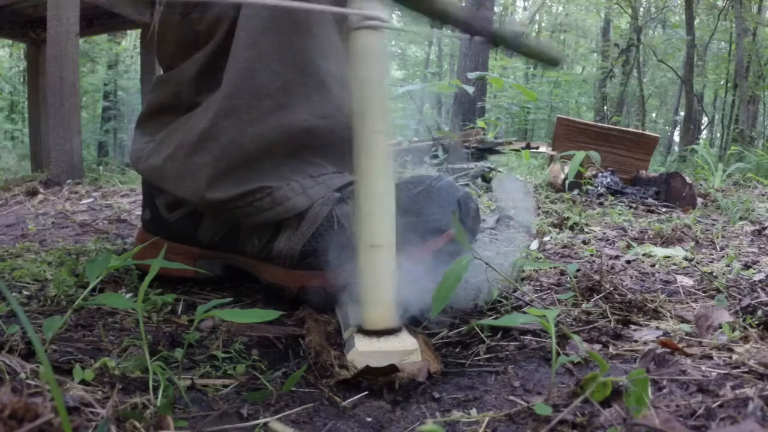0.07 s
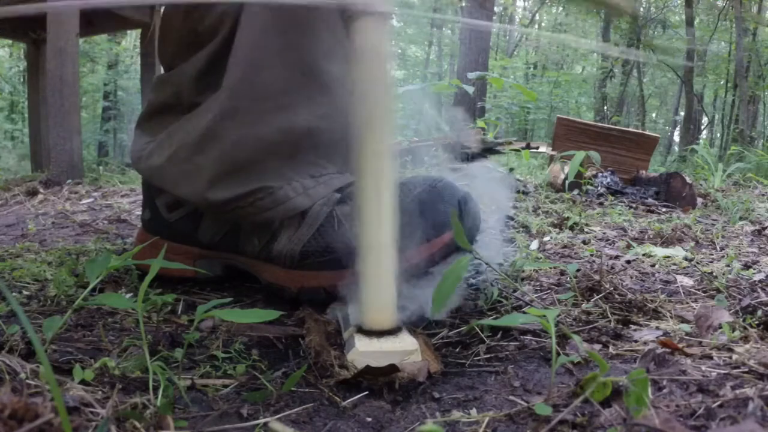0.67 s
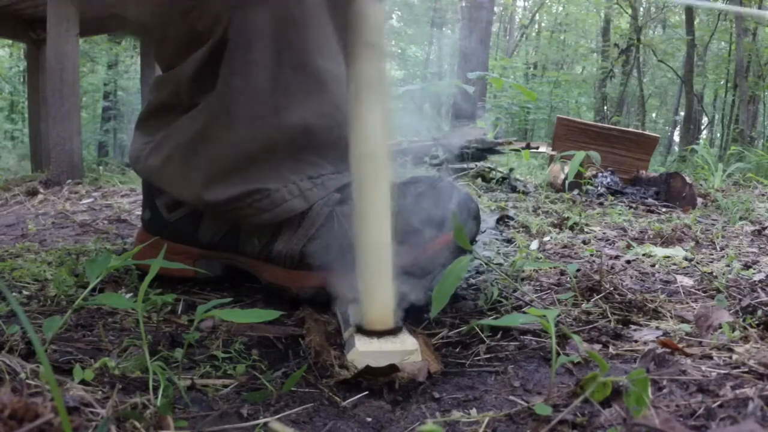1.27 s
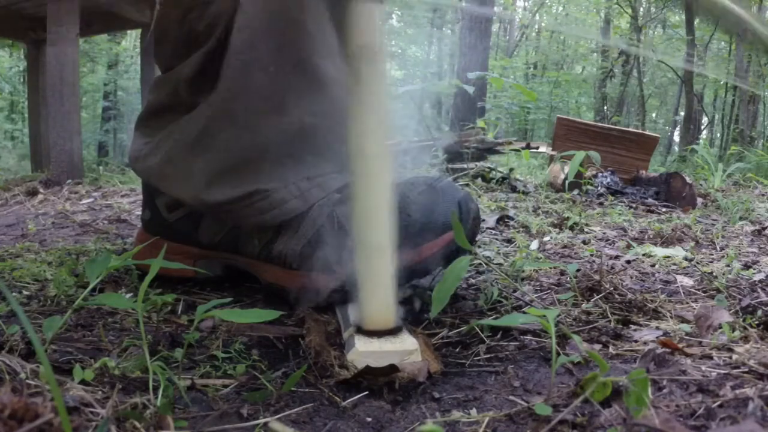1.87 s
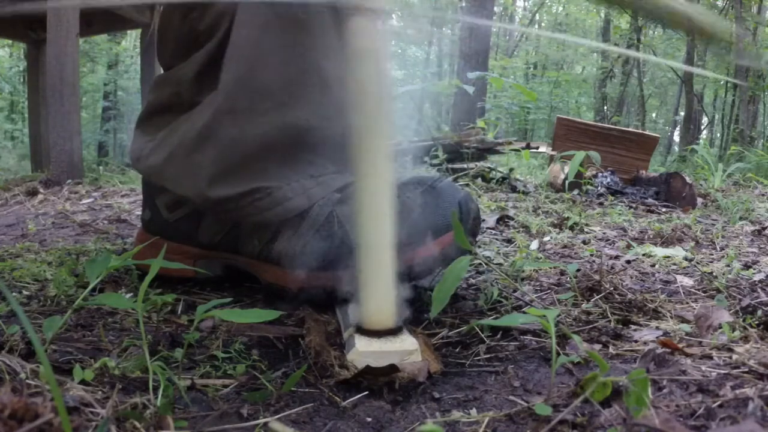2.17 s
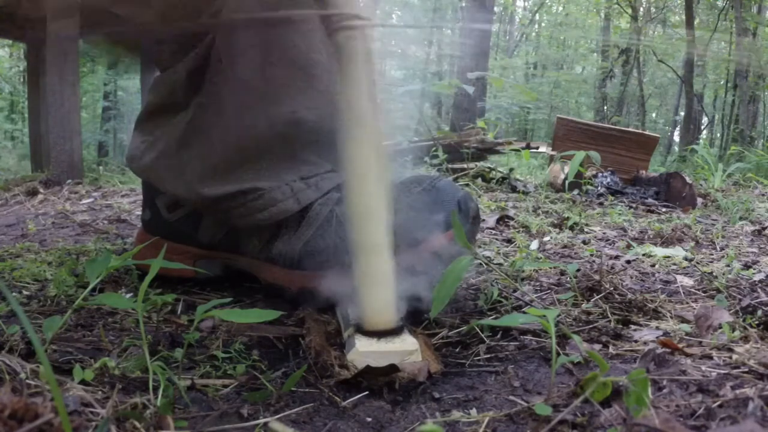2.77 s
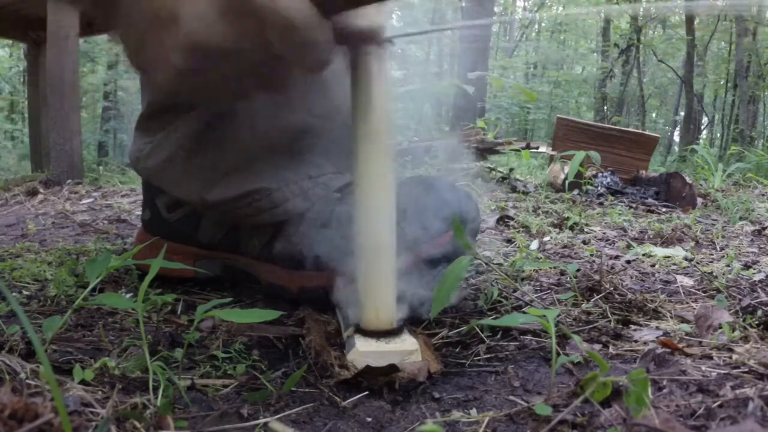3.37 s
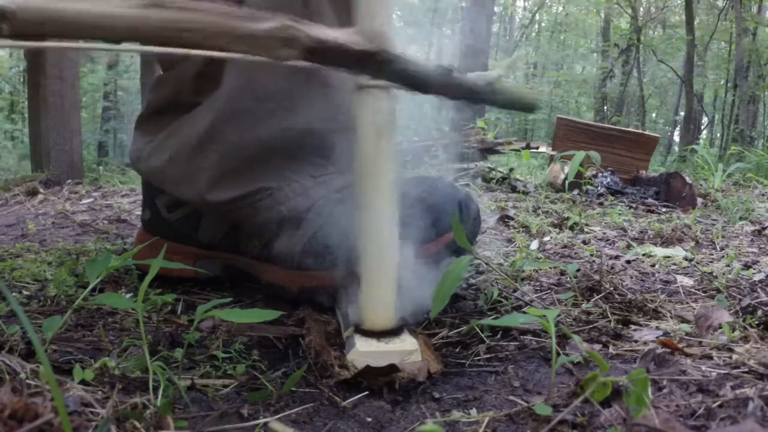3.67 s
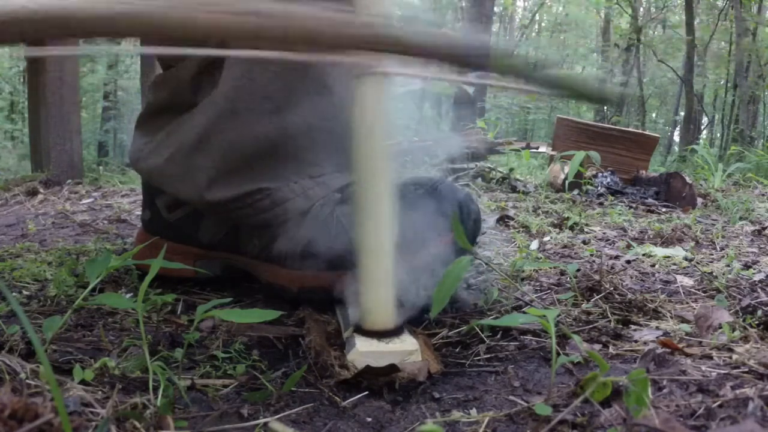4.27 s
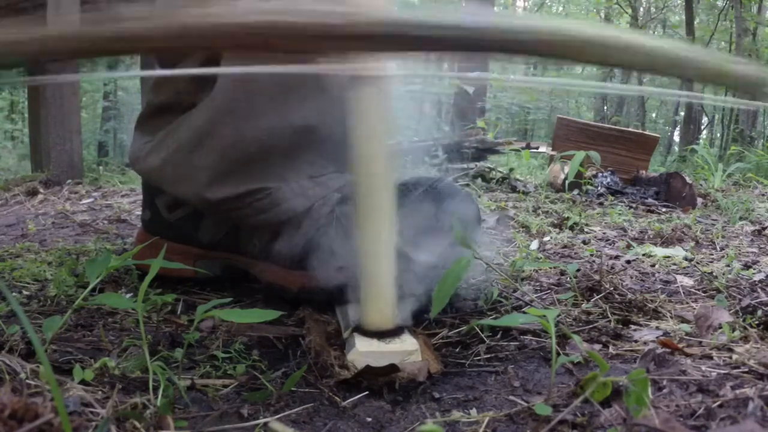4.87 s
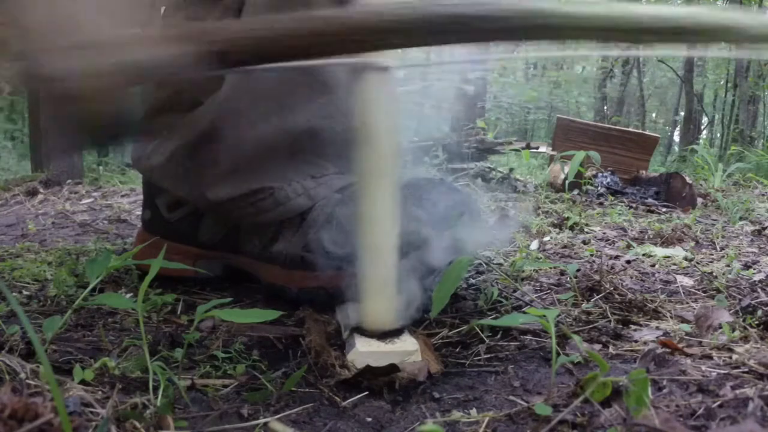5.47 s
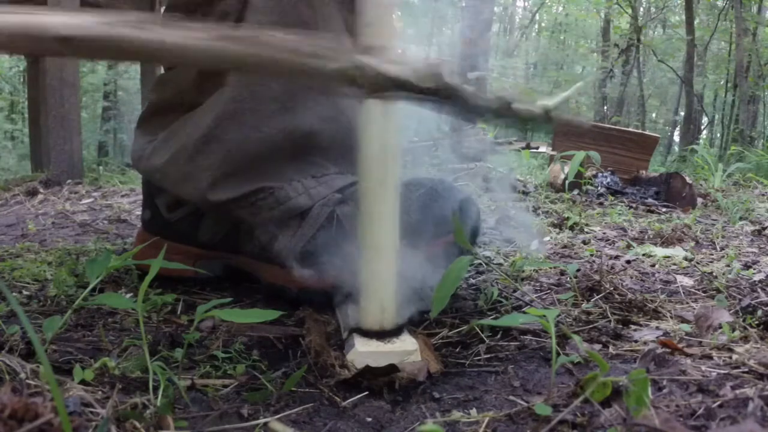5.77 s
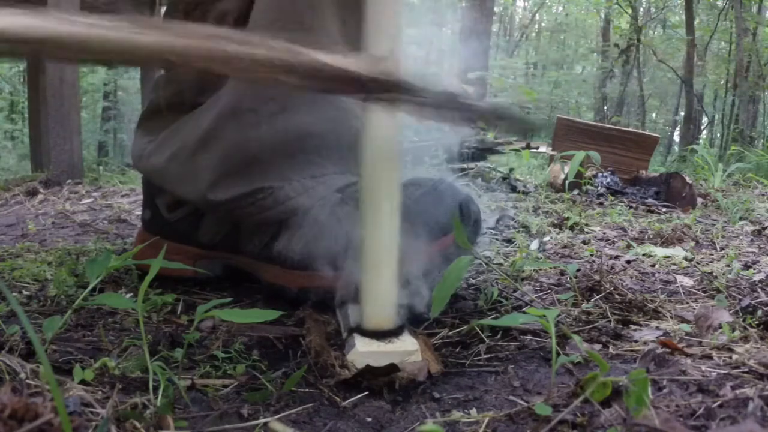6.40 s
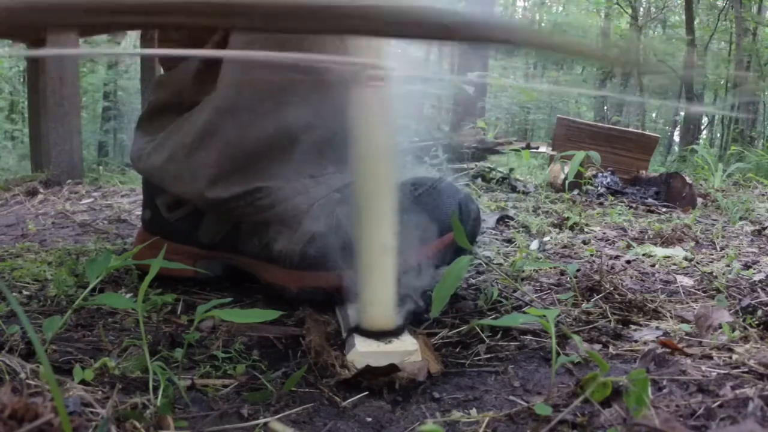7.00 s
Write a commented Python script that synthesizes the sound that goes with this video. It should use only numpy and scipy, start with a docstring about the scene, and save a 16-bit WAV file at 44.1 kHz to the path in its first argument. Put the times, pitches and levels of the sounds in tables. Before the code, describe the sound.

A bow drill runs from the start, close to the microphone on a forest floor. The wooden spindle spins up and stops about four times a second, each stroke a gritty, fluttering scrape with a low rumble from the board, a hiss and fine crackles of char. Hard and easy strokes alternate. The hard ones catch and knock in a quick chatter about every half second, with very short groans near 0.1, 0.6, 1.1 and 1.6 seconds. From about 1.6 seconds the chatter turns sharper, and it is stronger from 2.5 seconds on. The easy strokes carry a thin, hoarse squeak and end with a faint, falling hum of the cord. The grinding eases somewhat between 5 and 6 seconds while the knocking continues. A last chatter comes near 6.9 seconds, then a much softer stroke at 7. Behind it all lies a low, steady woodland hush, with almost no echo.

```python
"""A bow drill, worked on the forest floor close to the microphone.
The spindle spins up and stops with every stroke, grinding charred wood in the hearth board and
swelling once a turn. On the hard strokes it catches and slips, knocking the board and at first
groaning; on the easy ones it squeaks, and the bow cord hums faintly as it slackens.
Behind it lie quiet woodland air and a faint, dull scatter from trunks and leaves."""
import sys
import numpy as np
from scipy import signal
from scipy.fft import rfft, irfft
from scipy.io import wavfile

SR = 44100
rng = np.random.default_rng(int(sys.argv[2]) if len(sys.argv) > 2 else 0)


def generate_wav(sig):
    """Save sig (samples, or channels by samples) to the path in sys.argv[1] as 16-bit PCM at SR."""
    pcm = np.round(np.clip(np.atleast_2d(sig).T, -1, 1) * 32767).astype(np.int16)
    wavfile.write(sys.argv[1], SR, pcm)


N = 310464

# bow strokes, hard and easy in turn; at the "pass" the tip's high spot comes round near top speed:
# start t/s, pass t/s, end t/s, top spin/(turns/s), pressure/dB
STROKES = [(-0.044, 0.118, 0.207, 38.3, -28.5), (0.218, 0.365, 0.459, 35, -29),
           (0.463, 0.6038, 0.695, 35, -30), (0.701, 0.842, 0.935, 34, -31), (0.951, 1.0844, 1.183, 35, -30),
           (1.212, 1.305, 1.432, 36, -30.5), (1.425, 1.5676, 1.656, 37, -29),
           (1.662, 1.8, 1.908, 35.4, -30), (1.917, 2.0566, 2.162, 41, -28.3),
           (2.168, 2.31, 2.421, 48.4, -28.5), (2.439, 2.5781, 2.686, 45.6, -27),
           (2.71, 2.824, 2.965, 43, -29.5), (2.92, 3.1414, 3.224, 43.1, -27.7),
           (3.256, 3.379, 3.518, 38.7, -30.3), (3.521, 3.6694, 3.777, 41.2, -29.5),
           (3.83, 3.931, 4.071, 36.1, -30.5), (4.078, 4.2195, 4.325, 40.7, -29),
           (4.369, 4.47, 4.601, 39.7, -29), (4.604, 4.7444, 4.847, 44.1, -29),
           (4.847, 5.022, 5.123, 38.3, -33.5), (5.124, 5.2756, 5.385, 42.3, -32),
           (5.419, 5.558, 5.681, 36, -36), (5.63, 5.8377, 5.923, 38, -33.5), (5.957, 6.094, 6.209, 38, -31),
           (6.203, 6.3655, 6.467, 42.2, -31.5), (6.501, 6.648, 6.756, 38.4, -34),
           (6.763, 6.8936, 7.013, 39.7, -30), (6.996, 7.143, 7.271, 40, -45.5)]


def friction(slips, easy_smoothing=0.27):
    """The tip grinds in its socket: the faster, the louder, pressing harder once a turn."""
    # spectra of the rumbling board and the grinding, hissing tip: f/Hz, level/dB
    rumble_spectrum = [(24, -43), (40, -29), (75, 3), (119, -4.5), (140, -2), (190, -2.5), (294, -6.5),
                       (330, -5), (415, -3), (572, -8.5), (617, -13.5), (658, -18), (758, -20),
                       (850, -14.5), (1100, -58), (1870, -120)]
    grind_spectrum = [(410, -22), (700, -3), (851, -10), (989, -1), (1250, 1.5), (1620, -4), (1990, -7),
                      (2400, -8), (3120, -24), (5280, -120)]
    hiss_spectrum = [(1180, -39), (2000, -3), (2290, -13.5), (2630, 0), (3370, 2.5), (4480, 1),
                     (5360, -4.5), (6870, -11.5), (8150, -20), (9030, -13), (10000, -24.5), (11300, -21),
                     (14200, -44), (15500, -46)]
    # spectra of snapping char and of the glazed tip's hoarse squeak: f/Hz, level/dB
    crumb_spectrum = [(3000, -30), (7000, 7.5), (8200, 0.5), (9200, 2), (12000, -6.5), (15000, -12)]
    squeak_spectrum = [(3900, -6), (4500, 4.5), (5050, -12), (6700, -10.5), (7800, -32), (9200, -15.5),
                       (10200, -34)]
    # how strongly the char crumbles: t/s, level/dB
    crumbling = [(0, 1.5), (2.2, 0), (3.1, 4), (4.4, 3.5), (5.1, 0), (6, -0.5), (7, 1)]
    speed, swell, easy, (rumble_gain, grind_gain, hiss_gain) = bowing()
    uneven = drift(250) * (1 - easy_smoothing * easy)
    coarse, fine = grains(5000, spread_db=2.6), grains(20000, spread_db=2.4)
    rumble = coloured(rng.standard_normal(N), rumble_spectrum) * from_db(0.57 + 2 * swell)
    rumble *= speed ** 1.78
    grind = coloured(coarse, grind_spectrum) * from_db(2.35 + 2.55 * swell + 2 * uneven) * speed ** 1.365
    hiss = coloured(fine, hiss_spectrum) * from_db(-0.37 + 0.91 * swell + 3.36 * uneven) * speed ** 1.54
    # crumbs snap most often where the tip presses hardest
    snaps = grains(1200 * from_db(8 * swell), spread_db=4.2)
    crumbs = from_db(-14.5) * coloured(snaps, crumb_spectrum) * speed ** 1.52
    crumbs *= from_db(np.interp(np.arange(N) / SR, *np.transpose(crumbling)))
    squeak = coloured(rng.standard_normal(N), squeak_spectrum) * from_db(-6 + 9.5 * swell)
    squeak *= easy * speed ** 6  # only near the top speed of easy strokes
    rubbing = grind_gain * grind + hiss_gain * (hiss + crumbs + squeak)
    return rumble_gain * rumble + tip_contact(slips) * rubbing


def bowing():
    """The bow drives the spindle: speed (0-1), swell (-1 to 1), easy stroke (0/1), three rubbing gains."""
    speed, swell, easy, gains = np.zeros(N), np.zeros(N), np.zeros(N), np.zeros((3, N))
    for k, (*motion, pressure_db) in enumerate(STROKES):
        span, stroke_speed, turns = stroke(*motion)
        # a stroke takes over once it outruns the end of the one before
        faster = stroke_speed > speed[span]
        active = span[faster]
        speed[active], easy[active] = stroke_speed[faster], k % 2
        # the high spot passes quickly: narrow crests, broad troughs
        swell[active] = 2 * np.abs(np.cos(np.pi * turns[faster])) ** 3 - 1
        gains[:, active] = from_db(rubbing_db(pressure_db, k % 2))[:, None]
    return speed, swell, easy, gains


def stroke(start_s, pass_s, end_s, turns_per_s, lead_s=0.011):
    """One sweep of the bow, fastest just before the pass: samples, speed (0-1), turns from the pass."""
    span = np.arange(int(start_s * SR), int(end_s * SR))
    skew = np.log(.5) / np.log((pass_s - lead_s - start_s) / (end_s - start_s))
    speed = np.abs(np.sin(np.pi * np.linspace(0, 1, len(span)) ** skew))
    turns = turns_per_s * np.cumsum(speed ** .35) / SR
    turns -= np.interp(pass_s * SR, span, turns)
    heard = (span >= 0) & (span < N)
    return span[heard], speed[heard], turns[heard]


def rubbing_db(pressure_db, easy, usual_db=-28):
    """Rumble, grinding and hiss each rise with the pressure at their own rate."""
    # friction offsets on hard, then easy strokes: rumble/dB, grinding/dB, hiss/dB
    offsets_db = [(2, 0.27, 0), (-0.5, -3, -0.5)]
    db_per_db = np.array([0.62, 1.28, 0.86])
    return usual_db + db_per_db * (pressure_db - usual_db) + np.array(offsets_db[easy])


def grains(per_s, spread_db):
    """Fibres and char break in random clicks of very uneven size."""
    sizes = from_db(spread_db * np.minimum(rng.exponential(1, N), 5))
    return sizes * rng.choice([-1, 1], N) * (rng.random(N) < per_s / SR)


def slipping(turns_each_side=3, tap_hz=1260, sag_hz_per_s=1700):
    """The high spot catches once a turn. Rows: t/s, thump/dB, thud/dB, ring/dB, crack/dB, ring f/Hz."""
    # the spindle chatters in the middle of each hard stroke:
    # peak t/s, half-width/s, ground thump/dB, board thud/dB, spindle ring/dB, crack/dB, ring f/Hz
    chatters = [(.12, 0.046, -25, -24.5, -26, -42, 1170), (.612, 0.052, -26, -29.5, -30.5, -39, 1230),
                (1.1, 0.048, -26, -30.5, -27.5, -46, 1170), (1.567, .018, -33, -23.5, -9, -23, 1330),
                (2.05, 0.031, -25, -19, -15, -37, 1320), (2.589, 0.045, -21, -17, -14, -24, 1310),
                (3.138, 0.042, -22, -23, -17.5, -27.5, 1250), (3.68, 0.038, -19.5, -17, -17.5, -20, 1310),
                (4.226, .04, -19, -19.5, -21, -24, 1240), (4.745, 0.04, -22, -15.5, -14, -16.5, 1280),
                (5.284, .055, -24.5, -20.5, -14.5, -19.5, 1286), (5.827, 0.041, -22, -19, -15.5, -22, 1260),
                (6.36, .042, -23.5, -18, -14.5, -18, 1240), (6.904, 0.039, -21, -18, -22, -19.5, 1170)]
    # a light tap at top speed, relative to the grinding: thump/dB, thud/dB, ring/dB, crack/dB
    tap_db = (-3.5, -2.5, -1.5, -26)
    slips = []
    for k, (*motion, pressure_db) in enumerate(STROKES[:-1]):
        span, speed, turns = stroke(*motion)
        peak_s, width_s, *peak_db, ring_hz = chatters[k // 2]
        grind_db = rubbing_db(pressure_db, k % 2)[1]
        for turn in range(-turns_each_side, turns_each_side + 1):
            at_s, pace = np.interp(turn, turns, span / SR), np.interp(turn, turns, speed)
            tap = from_db(grind_db + np.array(tap_db) + 2 * rng.standard_normal(4)) * pace ** 1.92
            chatter = np.exp(-abs((at_s - peak_s) / width_s) ** 3.4)  # flat top, quick end
            knock = from_db(peak_db + 0.7 * rng.standard_normal(4)) * chatter
            hz = ring_hz - sag_hz_per_s * (at_s - peak_s) if knock.sum() > tap.sum() else tap_hz
            levels_db = 20 * np.log10(np.maximum(tap, knock) + 1e-9)
            slips.append((at_s, *levels_db, hz))
    return slips


def tip_contact(slips, dip_db=6, after_s=0.0105, width_s=0.0021):
    """After a slip the tip bounces and rubs less for a moment."""
    dips, t = np.zeros(N), np.arange(SR // 30) / SR
    bounce = np.exp(-((t - after_s) / width_s) ** 2)
    for at_s, _, thud_db, *_ in slips:
        add(dips, at_s, min(1, from_db(thud_db + 32)) * bounce)
    return from_db(-dip_db * dips)


def knocks(slips, scuff_s=0.0018, ring_t60_s=0.0087, return_s=0.0026, return_gain=0.64):
    """Each slip, a snap inside a short scuff, rings ground, board and spindle."""
    # modes of the board bouncing on the soil, and of the board itself: f/Hz, level/dB, t60/s
    ground_modes = [(79.4, -7, 0.068), (110, -6.5, 0.083), (187.7, -1.5, 0.052)]
    board_modes = [(396, 0.5, 0.02), (467.5, -4.5, 0.12)]
    # higher modes of the spindle: f/Hz, level/dB, t60/s
    spindle_modes = [(2220, -6, 0.0064), (2780, -5, 0.0036), (3460, -15.5, 0.024), (4370, -43, 0.022)]
    out = np.zeros(N)
    t = (np.arange(SR // 8) - SR // 200) / SR
    for at_s, thump_db, thud_db, ring_db, crack_db, ring_hz in slips:
        scuff = .055 * rng.standard_normal(len(t)) * np.exp(-np.abs(t) / scuff_s)
        push = bending_wave((t == 0) + scuff)
        # the wave runs up the spindle and comes back
        returned = return_gain * np.roll(push, int(return_s * SR * jitter(0.36)))
        # two close modes beat: the ring builds up briefly and stops short
        ring = mode(mode(push, ring_hz - 120, ring_t60_s), ring_hz + 120, ring_t60_s)
        knock = from_db(ring_db + 0.44) * ring
        knock += from_db(thump_db) * body(push, ground_modes)
        knock += from_db(thud_db) * body(push, board_modes)
        knock += from_db(crack_db) * body(push + returned, spindle_modes)
        add(out, at_s + t[0], knock)
    return board_radiation(out)


def bending_wave(push, soft_hz=5600, delay_at_1khz_s=0.00025):
    """A soft contact sends a bending wave along the wood; the treble arrives first."""
    hz = np.fft.rfftfreq(len(push), 1 / SR)
    travel = np.exp(-4j * np.pi * delay_at_1khz_s * np.sqrt(1000 * hz))
    dispersed = irfft(rfft(push) * travel, len(push))
    return signal.sosfilt(signal.butter(3, soft_hz, fs=SR, output="sos"), dispersed)


def body(push, modes):
    """The modes of one body, a little different in strength and pitch at every blow."""
    return sum(from_db(db) * jitter(3) * mode(push, hz * jitter(0.23), t60_s) for hz, db, t60_s in modes)


def mode(push, hz, t60_s):
    """One mode answering a push, scaled to the energy of 10 ms at rms 1."""
    radius, angle = from_db(-60 / (t60_s * SR)), 2 * np.pi * hz / SR
    out = signal.lfilter([1, 0, -1], [1, -2 * radius * np.cos(angle), radius ** 2], push)
    return out / np.sqrt(np.sum(out ** 2) / (SR / 100))


def board_radiation(x, low_hz=54.7, hollow_hz=650, hollow_depth=0.57):
    """The small board sheds the lowest bass, and cancels the spindle between their resonances."""
    notched = signal.lfilter(*signal.iirnotch(hollow_hz, Q=3.1, fs=SR), x)
    hollow = x + hollow_depth * (notched - x)
    return signal.sosfilt(signal.butter(2, low_hz, "high", fs=SR, output="sos"), hollow)


def groans(rise=0.114, waver=0.081, buzz=0.32):
    """Stick and slip lock to the board's resonance: a rough tone, rising as the spindle slows."""
    # slips running together into a groan: t/s, length/s, f/Hz, level/dB
    groan_events = [(.141, 0.04, 469, -21.5), (0.627, 0.03, 425, -30), (1.105, 0.029, 422, -19.5),
                    (1.592, 0.047, 478, -28.5)]
    out = np.zeros(N)
    for at_s, length_s, pitch_hz, level_db in groan_events:
        progress = np.linspace(0, 1, int(length_s * SR))
        hz = pitch_hz * (1 + rise * progress + waver * drift(387)[:len(progress)])
        phase = 2 * np.pi * np.cumsum(hz) / SR
        tone = np.sin(phase) + buzz * (np.sin(2 * phase) + np.sin(3 * phase))
        envelope = np.sqrt(np.abs(np.sin(np.pi * progress)))
        add(out, at_s, from_db(level_db) * envelope * tone)
    return out


def cord_hum(pitch_hz=165, level_db=-42, sag=0.267, length_s=0.186, lead_s=0.15):
    """At the end of each easy stroke the cord slackens and hums with a falling pitch."""
    out, progress = np.zeros(N), np.linspace(0, 1, int(length_s * SR))
    for _, _, end_s, *_ in STROKES[1::2]:
        hz = pitch_hz * jitter(0.793) * (1 - sag * progress)
        phase = 2 * np.pi * np.cumsum(hz) / SR
        tone = np.sin(phase) + from_db(-4) * np.sin(2 * phase) + from_db(-9) * np.sin(3 * phase)
        add(out, end_s - lead_s, from_db(level_db) * np.sin(np.pi * progress) * tone)
    return out


def woodland_scatter(x, level_db=-31, t60_s=0.088, delay_s=0.008, top_hz=1800):
    """Nearby trunks and leaves scatter a faint, dull tail back to the microphone."""
    t = np.arange(SR // 2) / SR
    tail = rng.standard_normal(len(t)) * from_db(-60 * t / t60_s) * (t > delay_s)
    tail = signal.sosfilt(signal.butter(1, top_hz, fs=SR, output="sos"), tail)
    return from_db(level_db) * signal.fftconvolve(x, tail / np.linalg.norm(tail))[:N]


def woodland_air(level_db=-40.5):
    """The still wood all around: a low, steady hush."""
    # spectrum of the air: f/Hz, level/dB
    air_spectrum = [(25, 6), (60, -0.5), (150, 0.5), (300, -9), (500, -19.5), (1000, -18.5), (2000, -32),
                    (4000, -32), (8000, -44.5), (15000, -54)]
    return from_db(level_db) * coloured(rng.standard_normal(N), air_spectrum)


def coloured(x, spectrum):
    """Shape x by a spectrum that falls 40 dB an octave beyond its ends; rms 1."""
    hz = np.maximum(np.fft.rfftfreq(N, 1 / SR), 1)
    points_hz, level_db = np.transpose(spectrum)
    octaves_outside = np.abs(np.log2(hz / np.clip(hz, points_hz[0], points_hz[-1])))
    gain = from_db(np.interp(np.log(hz), np.log(points_hz), level_db) - 40 * octaves_outside)
    return rms_one(irfft(rfft(x) * gain, N))


def drift(per_s):
    """A random wander with per_s new values a second; rms 1."""
    count = int(N / SR * per_s) + 2
    return rms_one(np.interp(np.arange(N) / SR * per_s, np.arange(count), rng.standard_normal(count)))


def jitter(spread_db):
    """A random factor around 1."""
    return from_db(spread_db * rng.standard_normal())


def from_db(db):
    return 10 ** (np.asarray(db) / 20)


def rms_one(x):
    return x / np.sqrt(np.mean(x ** 2) + 1e-20)


def add(track, at_s, sound):
    at = int(np.clip(round(at_s * SR), 0, N))
    track[at:at + len(sound)] += sound[:N - at]


def scene():
    """The drill close up, the quiet wood behind; mono."""
    slips = slipping()
    drill = friction(slips) + knocks(slips) + groans() + cord_hum()
    return (drill + woodland_scatter(drill) + woodland_air())[None]


def record(dry):
    """The microphone sheds the deepest bass, the highest peaks are rounded and the top is cut."""
    low_hz, top_hz, ceiling = 35, 15400, 0.97
    lean = signal.sosfilt(signal.butter(2, low_hz, "high", fs=SR, output="sos"), dry)
    rounded = ceiling * np.tanh(lean / ceiling)
    return signal.sosfilt(signal.ellip(10, .3, 80, top_hz, fs=SR, output="sos"), rounded)


dry = scene()
out = record(dry)
generate_wav(out)
```